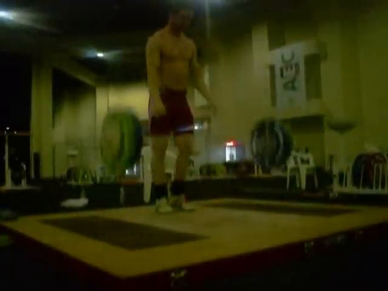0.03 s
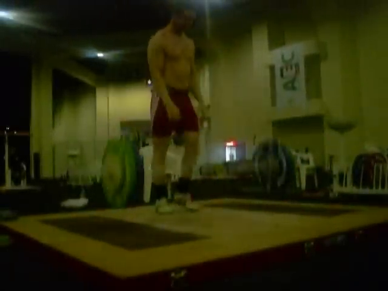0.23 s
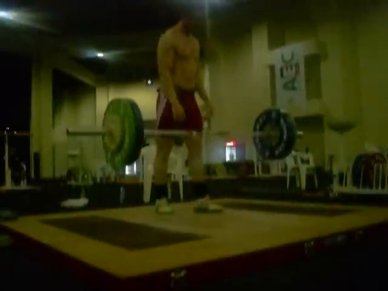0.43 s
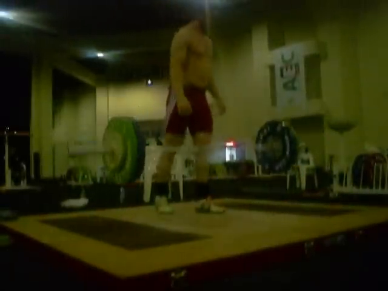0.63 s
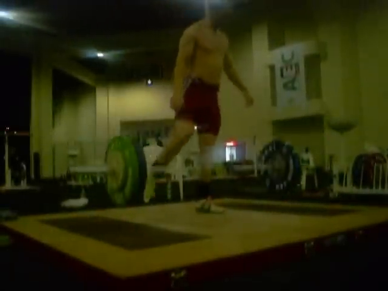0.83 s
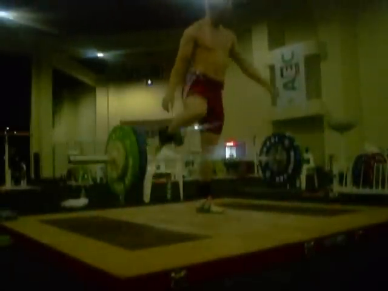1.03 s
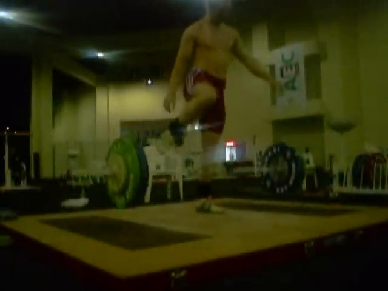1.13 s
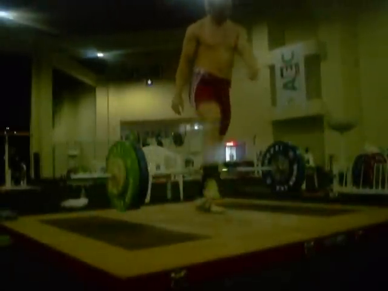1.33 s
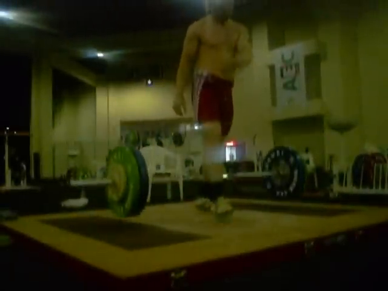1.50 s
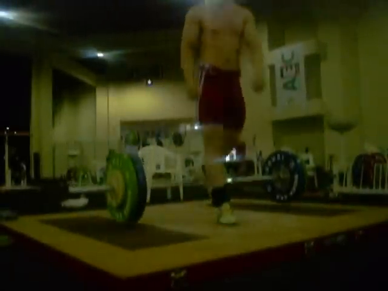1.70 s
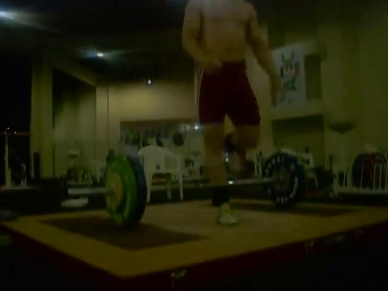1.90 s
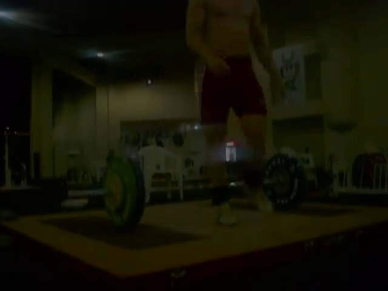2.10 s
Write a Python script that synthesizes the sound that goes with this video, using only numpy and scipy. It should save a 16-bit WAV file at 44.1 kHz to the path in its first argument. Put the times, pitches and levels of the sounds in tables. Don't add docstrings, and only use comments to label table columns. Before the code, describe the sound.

A loaded barbell bounces on a wooden platform in a large, humming gym, with a faint whine and an earlier drop's echo. A huge clipped thump and bright steel clatter hit at 0.24 s, a rattling double blow at 0.83, lighter ones at 1.27 and 1.5, then small knocks and rumbles at 1.84 and 2.07. The hall rings on while everything steadily fades after 0.75 s.

```python
import sys
import numpy as np
from scipy import signal
from scipy.fft import rfft, irfft
from scipy.io import wavfile
from scipy.ndimage import uniform_filter1d, map_coordinates

SR = 44100
rng = np.random.default_rng(int(sys.argv[2]) if len(sys.argv) > 2 else 0)


def to_linear_factor(level_db):
    exponent = np.asarray(level_db, float) / 20
    return 10 ** exponent


def file_out(sig):
    cols = np.atleast_2d(sig).T
    lim = np.clip(cols, -1, 1)
    pcm = np.round(lim * 32767).astype(np.int16)
    wavfile.write(sys.argv[1], SR, pcm)


N = 94815
T = np.arange(N) / SR


def unit(x):
    return x / np.sqrt(np.mean(x ** 2))


def band(x, hz, width_hz):
    return signal.lfilter(*signal.iirpeak(min(hz, 0.45 * SR), hz / width_hz, fs=SR), x)


def noise_band(x, hz, first_width_hz, second_width_hz):
    return unit(band(band(x, hz, first_width_hz), hz, second_width_hz))


def at_hz(hz, points):
    p = np.array(points, float)
    return np.interp(np.log(hz), np.log(p[:, 0]), p[:, 1])


def colour(x, points):
    f = np.maximum(np.fft.rfftfreq(1024, 1 / SR), 1)
    cepstrum = irfft(np.log(to_linear_factor(at_hz(f, points))))
    cepstrum[1:512] *= 2
    cepstrum[513:] = 0
    response = irfft(np.exp(rfft(cepstrum)))
    return signal.fftconvolve(x, response)[:len(x)]


def ring(x, modes, even=False):
    out = 0
    for hz, db, t60 in modes:
        pole = np.exp(2j * np.pi * hz / SR - np.log(1000) / (t60 * SR))
        gain = np.sqrt(1 - abs(pole) ** 2) if even else 1
        out = out + to_linear_factor(db) * signal.lfilter([1], [1, -pole], x).imag * gain
    return out


def walk(rate_hz):
    k = int(SR / rate_hz)
    steps = np.repeat(rng.standard_normal(N // k + 1), k)
    return unit(uniform_filter1d(uniform_filter1d(steps, k), k)[:N])


def shifted(x, delay_samples):
    return map_coordinates(x, [np.arange(N) + delay_samples], mode="nearest")


def burst(start_s, hold_s, release_s):
    rise = np.clip((T - start_s) / 0.003, 0, 1)
    return rise * np.exp(-np.maximum(T - start_s - hold_s, 0) / release_s)


def background():
    # pitch_hz, density_db (per Hz)
    hum_colour = [(25, 0), (100, -1), (170, -5), (400, -7), (800, -14.5), (2500, -13.5), (6000, -24.5),
                  (15500, -40.5)]
    # pitch_hz, width_hz, level_db
    earlier = [(98, 125, -34), (158.4, 56, -33), (780, 250, -31), (1380, 160, -34.5), (2900, 2300, -53),
               (5850, 1900, -57)]
    hum_db, whine_hz, whine_db, earlier_t60_s = -28.5, 7870, -47.5, 8.4
    hum = 0
    for hz in 28 * 2 ** np.arange(0, 9.2, 0.5):
        db = at_hz(hz, hum_colour) + 10 * np.log10(hz) + 2.0 * walk(9.7)
        hum = hum + to_linear_factor(db) * noise_band(rng.standard_normal(N), hz, hz / 2, hz / 2)
    echo = 0
    for hz, width, db in earlier:
        flicker = to_linear_factor(db + 1.5 * walk(12.9))
        echo = echo + flicker * noise_band(rng.standard_normal(N), hz, width, width)
    whine = to_linear_factor(whine_db + 0.45 * walk(21)) * np.sqrt(2) * np.sin(2 * np.pi * whine_hz * T)
    return to_linear_factor(hum_db) * unit(hum) + echo * to_linear_factor(-60 * T / earlier_t60_s) + whine


def rumble():
    # start_s, level_db, hold_s, centre_hz
    rumbles = [(0.237, -16, 0.032, 450), (0.833, -26.5, 0.037, 740), (1.271, -18.5, 0.027, 470),
               (1.507, -17, 0.022, 752), (1.547, -20, 0.011, 500), (1.542, -23, 0.11, 130),
               (1.57, -17, 0.013, 530), (1.592, -14, .012, 374), (1.61, -22, 0.047, 424),
               (1.657, -25.5, 0.207, 186), (2.066, -18.5, 0.042, 568), (1.896, -25, 0.34, 91),
               (2.106, -26, 0.015, 370)]
    out = 0
    for s, db, hold, hz in rumbles:
        grain = rng.standard_normal(N) * to_linear_factor(2.5 * walk(150))
        out = out + to_linear_factor(db) * burst(s, hold, 0.0069) * noise_band(grain, hz, 1.28 * hz, 2.85 * hz)
    return out


def thumps():
    # start_s, level_db, contact_ms, clack_db (relative to the push)
    landings = [(0.238, 7, 3.77, -17), (0.2453, -7, 2.6, -13), (.2595, -17, 2.2, -13),
                (.262, -16, 4.3, -19), (.832, -4, 2.66, -16), (0.843, -6, 2.7, -9), (.8605, -12, 1.6, -6),
                (1.2693, -8, 2.9, -11.5), (1.2761, -8.5, 3.4, -9), (1.304, -15, 2.7, -8),
                (1.509, -7.5, 3.5, -15), (1.5105, -2, 2.56, -1.5), (1.517, -7.5, 1.27, -4),
                (1.5206, -3, 3.4, -9.5), (1.5269, -9, 1.5, -8.5), (1.5305, -5.5, 3.9, -25),
                (1.5996, -15.5, 1.7, -12), (1.841, -13.5, 2.2, -1.5), (2.070, -14, 2.8, -24),
                (2.0756, -3.5, 3.5, -13), (2.1415, -23, 3.2, -11)]
    # pitch_hz, level_db, t60_s
    boards = [(43.6, -11, 0.19), (89, -26, 0.032), (130, 1, 0.039), (165.6, -3, 0.052), (243, -9, .03),
              (342, 8, 0.026)]
    # pitch_hz, level_db, t60_s
    clack_modes = [(465, -3.5, 0.045), (676, -0.5, 0.017), (775, 9.5, 0.032), (1030, -12.5, 0.016)]
    swing_hz, swing_width_hz, rebound_s = 106, 110, 0.0025
    push, clack = np.zeros(N), np.zeros(N)
    for s, db, ms, clack_db in landings:
        bump = np.sin(np.pi * np.clip((T - s) / (ms / 1000), 0, 1))
        push -= to_linear_factor(db) * bump
        clack -= to_linear_factor(db + clack_db) * bump ** 5
    w = 2 * np.pi
    swing = signal.lfilter(*signal.bilinear([1, 0, 0], [1, w * swing_width_hz, (w * swing_hz) ** 2], SR), push)
    boom = ring(np.roll(push, int(rebound_s * SR)), boards)
    return 0.83 * swing - to_linear_factor(-48.5) * boom + to_linear_factor(-28.0) * ring(clack, clack_modes)


def loose_clicks():
    clicks_per_s, scatter_db, surge_db = 8000, 1.8, 1.2
    hits = (rng.random(N) < clicks_per_s / SR) * to_linear_factor(scatter_db * rng.exponential(size=N))
    return unit(hits * rng.standard_normal(N)) * to_linear_factor(surge_db * walk(250))


def bar_ring(x):
    bar_hz = [1319, 2600, 3052, 3391, 4624, 5233, 5502, 5922, 6465, 6950, 7429, 7900, 8414, 8952]
    # level_db, t60_s
    bar_decay = [(-3, 0.37), (-37, .03), (3.5, 0.046), (-5, 0.048), (-7.5, 0.0089), (-5.5, 0.012),
                 (1, 0.029), (2, 0.046), (-0.5, 0.052), (-2, 0.084), (-1.5, 0.02), (-11.5, 0.014),
                 (-3.5, 0.026), (-13.5, 0.022)]
    modes = [(hz, db, t60) for hz, (db, t60) in zip(bar_hz, bar_decay)]
    wander_s = 0.00282 * walk(12) / 20
    return shifted(ring(x, modes, True), SR * wander_s)


def chatter():
    # start_s, level_db, hold_s, ringing_share (0-1), tilt (dull below -1.4, fully bright above
    bursts = [(0.239, -30, .002, .1, 0), (0.24, 0.5, 0.012, 0.28, 1.55), (0.2598, -13.5, 0.011, 0.5, -2),
              (0.263, -2, 0.036, 0.6, 1.5), (0.297, -27, 0.0081, 0.5, 5), (0.8349, -5.5, 0.018, 0.33, 0.5),
              (.857, -26, 0.0086, 0.06, 3), (.868, -5.5, 0.029, 0.3, -0.2), (0.894, -19, 0.035, 0.5, 1),
              (0.924, -25, 0.0055, 0.8, 2), (1.274, -5, 0.013, 0.27, 0), (1.285, -13, 0.01, 0.7, 2.5),
              (1.302, -10.5, 0.009, 0.35, 1), (1.3173, -7, 0.015, 0.1, -0.4), (1.33, -36, 0.0055, 0.5, 11),
              (1.373, -19.5, 0.0054, 0.8, -3), (1.5364, -4.5, 0.0031, 0.5, 5), (1.583, -29, 0.02, 0.4, -1),
              (1.597, -11, 0.029, 0.3, 2), (1.839, -11.5, 0.012, 0.6, -0.5), (1.856, -18, 0.017, .6, -2.5),
              (1.895, -22, 0.014, 0.7, -6), (2.03, -19, 0.017, 0.94, 0), (2.049, -20, 0.0047, 0.4, 0),
              (2.104, -18.5, 0.0098, .6, -0.5), (2.121, -19, 0.028, 0.5, 20)]
    # pitch_hz, level_db, t60_s
    sleeve_modes = [(1970, -25, 0.0089), (1960, -8, 0.038), (2360, -0.5, 0.012), (2580, 2, 0.018),
                    (2667, -12, 0.0091), (2900, -0.5, 0.013), (3130, 6.5, 0.018), (3500, 9.5, 0.0053),
                    (4430, -5, 0.011), (5180, -0.5, 0.048), (5356, -9, 0.0085), (5474, 5.5, 0.0065),
                    (6100, 0, 0.0075), (7770, 4, 0.027)]
    # pitch_hz, density_db (per Hz)
    steel = [(300, -27), (900, -1.5), (1800, 6.5), (3300, 8), (6000, 3.5), (8000, -1.5), (10000, -5),
             (15500, -8)]
    release_s, bar_db = 0.0045, -20.5
    after_db, after_t60_s, after_full_s = -17, 1.35, 0.036
    clicks = loose_clicks()
    bright = unit(np.diff(clicks, prepend=0))
    tonal, broad, shake_power = np.zeros(N), np.zeros(N), np.zeros(N)
    for s, db, hold, share, tilt in bursts:
        fading = to_linear_factor(db + after_db - 60 * np.maximum(T - s, 0) / after_t60_s)
        shake_power += (np.clip((T - s) / 0.003, 0, 1) * fading) ** 2 * hold / after_full_s
        share, lean = np.clip(share, 0, 1), np.clip(0.26 + 0.19 * tilt, 0, 1)
        source = to_linear_factor(db) * burst(s, hold, release_s) * ((1 - lean) * clicks + lean * bright)
        tonal += np.sqrt(share) * source
        broad += np.sqrt(1 - share) * source
    after = np.sqrt(shake_power) * rng.standard_normal(N) * to_linear_factor(0.5 * walk(64))

    def rms_of(x):
        return np.sqrt(np.mean(x ** 2))

    sleeves = ring(tonal + 0.061 * after, sleeve_modes, True) / rms_of(ring(clicks, sleeve_modes, True))
    scrape = colour(broad + after, steel) / rms_of(colour(clicks, steel))
    return sleeves + scrape + to_linear_factor(bar_db) * bar_ring(tonal + broad + to_linear_factor(11.5) * after)


def blows():
    # start_s, level_db, pitch_hz, t60_s
    pings = [(0.2658, -2, 2836, 0.028), (.268, -5, 7740, .04), (0.273, -12, 5360, 0.043),
             (.283, -9, 3120, .035), (0.298, -7, 2470, 0.025), (0.308, -14, 2980, 0.021),
             (.8385, 1, 2510, 0.013), (0.843, -14, 5640, 0.027), (.851, -5, 8010, .025),
             (.864, -9, 2920, .03), (.872, -5, 2780, 0.029), (.877, -11, 5200, .03),
             (.882, -2, 3060, 0.032), (.890, -2, 5220, .03), (.898, -12, 3260, 0.021),
             (0.918, -9, 2970, .04), (1.278, -5.5, 5340, 0.036), (1.2763, -7.5, 3130, 0.028),
             (1.285, -11, 2320, 0.035), (1.3056, -5, 2574, .03), (1.3056, -16, 5370, 0.06),
             (1.319, -12, 1960, 0.017), (1.321, -0.5, 5590, .03), (1.322, -5, 3025, 0.046),
             (1.334, -5, 3100, 0.031), (1.332, -4.5, 5520, 0.039), (1.538, -8, 5270, 0.02),
             (1.538, -22, 8900, 0.0079), (1.586, -16.5, 6840, 0.09), (1.605, -10.5, 2130, 0.036),
             (1.605, -10.5, 5400, 0.058), (1.607, -11, 7950, .015), (1.612, -11.5, 1895, .04),
             (1.845, -10.5, 2460, .03), (1.846, -11, 3190, 0.031), (1.844, -12, 5500, .03),
             (.846, -12.5, 2116, .04), (.885, -11, 2000, 0.054), (.92, -15.5, 2010, 0.07),
             (.276, -7, 2220, 0.037), (.29, -9, 2550, 0.034)]
    # start_s, level_db, pitch_hz, t60_s
    knocks = [(0.328, -18, 180, 0.18), (.836, -11, 522, 0.059), (.853, -22, 634, 0.034),
              (.872, -9, 900, 0.065), (1.14, -18, 318.4, 0.08), (1.512, -10, 48, 0.28),
              (1.513, -18, 897, 0.056), (1.574, -10.5, 448, .1), (.246, -11.5, 526, 0.077),
              (1.815, -8.5, 150, 0.11), (1.842, -16.5, 172, 0.065), (1.904, -11.5, 148, 0.12),
              (2.015, -14, 380, 0.14), (2.079, -12, 130, .07), (2.084, -8.5, 732, 0.077),
              (2.104, -5, 355, 0.048)]
    out = 0
    for s, db, hz, t60 in pings + knocks:
        late = np.maximum(T - s, 0)
        rise = np.clip(late / max(0.001, 1 / hz), 0, 1)
        out = out + to_linear_factor(db - 60 * late / t60) * rise * np.sin(2 * np.pi * hz * late)
    return out


def hall(x):
    # pitch_hz, t60_s, level_db
    hall_bands = [(54.7, 1.4, -21), (134, 0.22, -14.5), (231, 3.1, -23), (500, 4.3, -10.5),
                  (950, 4.16, -10), (1730, 0.86, -9), (4220, 1.75, -8.5), (8600, 1.2, -16.5),
                  (13300, 0.81, -8.5)]
    gap_s, early_t60_s, early_db = 0.01, 0.091, 12
    late = np.maximum(T - gap_s, 0)
    tail = 0
    for hz, t60, db in hall_bands:
        env = to_linear_factor(-60 * late / t60) + to_linear_factor(early_db - 60 * late / early_t60_s)
        noise = noise_band(rng.standard_normal(N), hz, hz * 1.17, hz * 1.17)
        tail = tail + to_linear_factor(db) * noise * env * np.sqrt(hz / SR / SR * 20) * np.clip(late / 0.015, 0, 1)
    return signal.fftconvolve(x, tail)[:N]


def scene():
    near = rumble() + thumps() + chatter() + blows()
    air_drift_s = 0.0001576 * walk(25)
    wet = shifted(hall(near), SR * air_drift_s)
    return (background() + near + wet)[None]


def roll_off(x):
    return signal.sosfilt(signal.butter(12, 15700, fs=SR, output="sos"), x)


def record(dry):
    clip_db, top_hz, fade_start_s, fade_end_s = -0.3, 16000, 0.75, 2.4
    x = np.clip(dry, -to_linear_factor(clip_db), to_linear_factor(clip_db))
    x = signal.sosfilt(signal.cheby2(14, 38, top_hz, fs=SR, output="sos"), x)
    fade = np.clip((fade_end_s - T) / (fade_end_s - fade_start_s), 0, 1)
    return roll_off(x * fade)


dry = scene()
out = record(dry)
file_out(out)
```